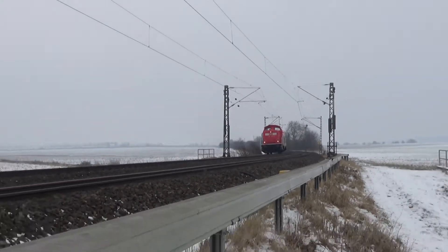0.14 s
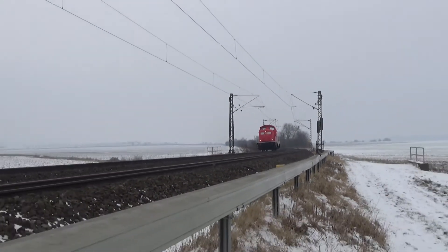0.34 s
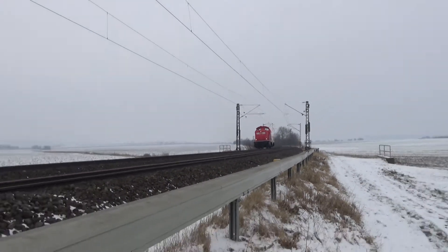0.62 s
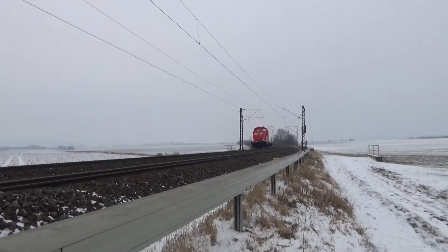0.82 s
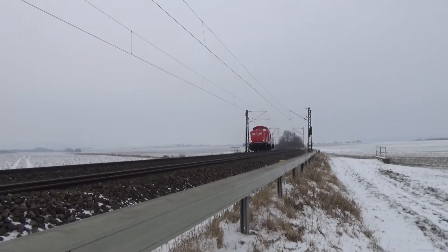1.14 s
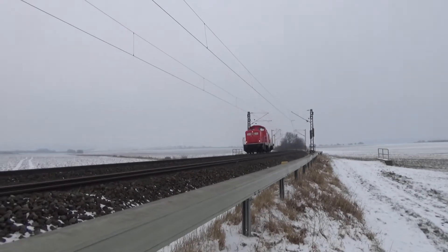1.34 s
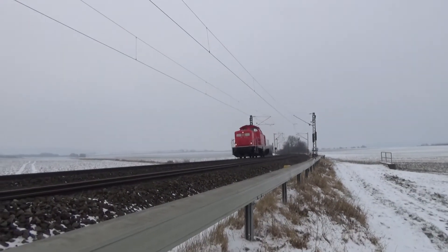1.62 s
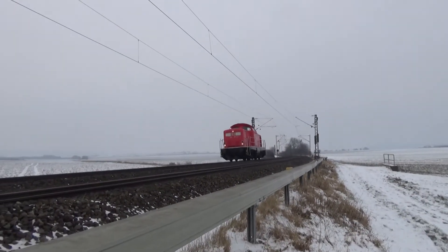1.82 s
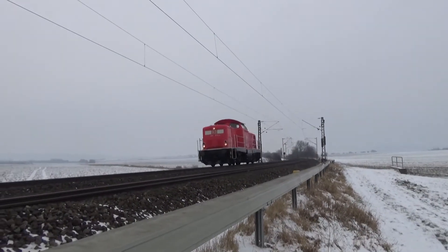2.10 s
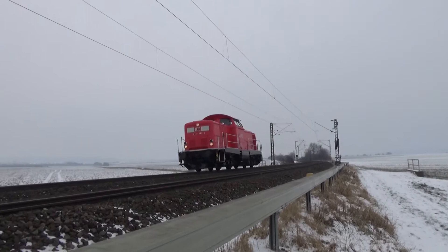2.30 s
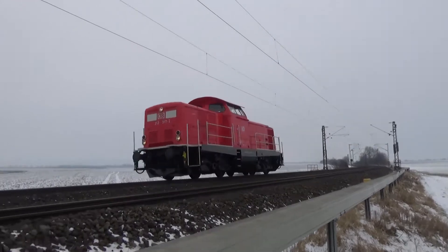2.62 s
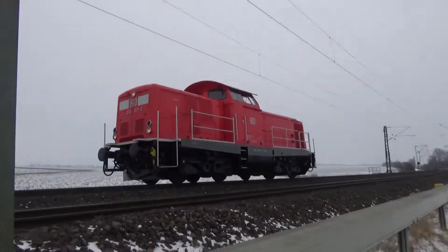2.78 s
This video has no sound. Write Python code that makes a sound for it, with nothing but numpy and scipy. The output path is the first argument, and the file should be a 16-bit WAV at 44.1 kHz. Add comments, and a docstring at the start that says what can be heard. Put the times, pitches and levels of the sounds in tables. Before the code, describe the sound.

A lone diesel locomotive approaches on ringing rails, its throbbing engine drone swelling into rolling roar

```python
"""Beside an open railway line a diesel locomotive approaches and draws level with the listener.
A faint steady noise floor underlies the rails, which ring ahead as noise-driven narrow resonances.
Rolling noise from the wheels swells as drone, roar and hiss; the drive adds an unsteady sine whine.
The engine is a sum of shaft orders over exhaust noise that puffs twice a cycle."""
import sys
import numpy as np
from scipy import signal
from scipy.fft import rfft, irfft, next_fast_len
from scipy.io import wavfile
from scipy.ndimage import uniform_filter1d, map_coordinates

SR = 44100
rng = np.random.default_rng(int(sys.argv[2]) if len(sys.argv) > 2 else 0)


def waveform_to_disk(signal):
    """Save audio, clipped to [-1, 1], as 16-bit WAV at the path in sys.argv[1]."""
    frames = np.transpose(np.atleast_2d(signal))
    scaled = np.clip(frames, -1, 1) * 32767
    samples = np.round(scaled).astype(np.int16)
    wavfile.write(sys.argv[1], SR, samples)


N = 130095


def amp(db):
    """Level law: amplitude gain is 10 to the power dB/20."""
    return 10 ** (np.asarray(db) / 20)


def unit(x):
    """Normalization of the effective value: rms 1."""
    return x / np.sqrt(np.mean(x ** 2) + 1e-20)


def along(points, hz, outside=None):
    """Logarithmic frequency scale: linear interpolation of (f/Hz, value) points over log f."""
    f, values = np.transpose(points)
    return np.interp(np.log(hz + 1), np.log(f + 1), values, outside, outside)


def curves(rows):
    """Slow modulation: each column after t/s interpolated to one value per sample."""
    t, *columns = np.transpose(rows)
    return [np.interp(np.arange(N) / SR, t, column) for column in columns]


def wobble(rate):
    """Random modulation: a spline through normal random knots, rate of them per second."""
    knots = rng.standard_normal(int(N * rate / SR) + 4)
    return map_coordinates(knots, [np.arange(N) * rate / SR])


def filtered(x, response):
    """Linear filtering: the spectrum multiplied by a complex response of frequency."""
    m = next_fast_len(N + SR // 4)
    spectrum = rfft(x, m) * response(np.fft.rfftfreq(m, 1 / SR))
    return irfft(spectrum, m)[..., :N]


def shape(points):
    """Spectral envelope: gain of an (f/Hz, level/dB) outline, -120 dB outside it."""
    return lambda hz: amp(along(points, hz, outside=-120))


def ringing(modes, levels_db):
    """Modal superposition: steep-sided resonances (f/Hz, width/Hz) added in power."""
    def gain(hz):
        power = 0
        for (f, width), db in zip(modes, levels_db):
            power = power + (amp(db) / (1 + ((hz - f) / width) ** 2) ** 1.22) ** 2
        return np.sqrt(power)
    return gain


def pan(db):
    """Interchannel level difference: left and right gains for a left-right difference."""
    return amp(np.array([db / 2, -db / 2]))


# Side signal relative to the mid signal, before each is filled with noise: f/Hz, level/dB
SIDE_SPREAD = [(100, -14), (1000, -82), (2500, -34), (6000, -33.5), (9000, -38), (13000, -39.5)]


def rush(gain, patchy_db):
    """Interchannel coherence: noise of rms 1 with patchy gain, mostly common to both channels."""
    z = signal.stft(rng.standard_normal((2, N)), nperseg=512)[2]
    field = rng.standard_normal(z.shape[1:])
    field = uniform_filter1d(field, size=8, axis=0)  # smooth over frequency
    field = uniform_filter1d(field, size=10, axis=1)  # smooth over time
    patchy = z * amp(patchy_db * unit(field))
    pair = signal.istft(patchy, nperseg=512)[1][:, :N]
    mid, side = filtered(pair, lambda hz: gain(hz) * np.array([1 + 0 * hz, amp(along(SIDE_SPREAD, hz))]))
    return unit(np.array([mid + side, mid - side]))


# Outline of the noise floor, strongest around 600-930 Hz: f/Hz, relative level/dB per Hz
FLOOR_SPECTRUM = [(450, -35), (600, -4), (780, 0), (930, -9), (1100, -30)]


def noise_floor():
    """Stationary random noise: a faint band of steady mean level."""
    return amp(-53.5) * rush(shape(FLOOR_SPECTRUM), patchy_db=0.3)


# Rails before fade and trim: t/s, singing level/dB, treble level/dB
RAIL_LEVELS = [(0, -43.5, -64), (.3, -40.5, -61.5), (.7, -37.5, -57.5), (1.1, -34, -53), (1.5, -31.5, -51),
               (1.9, -33, -48.5), (2.3, -29.5, -49.5), (2.95, -39, -46)]
# Share of song and treble as the wheels take over: t/s, level/dB
RAIL_SHARE = [(0, 4), (1.5, -2), (2.2, -3), (2.95, -11)]
# Thin rail whistle before its flicker: t/s, level/dB
WHISTLE_LEVELS = [(0, -66.5), (.6, -58.5), (1.2, -58.5), (1.8, -58.5), (2.3, -53), (2.95, -60)]
# Resonances of the singing rail: f/Hz, width/Hz; then one relative level/dB each
SONG_RESONANCES = [(1030, 50), (1070, 30), (1125, 30), (1190, 60), (1260, 18), (1340, 25), (1367, 18),
                   (1415, 30), (1540, 25), (1950, 40)]
SONG_RESONANCE_DB = [-13.5, -7, -7, -11, 1.5, -4, -4, -12, -29.5, -24]
# Resonances of the rail treble: f/Hz, width/Hz; then one relative level/dB each
TREBLE_RESONANCES = [(7080, 330), (7900, 600), (8750, 350), (9080, 130), (9780, 220), (10800, 250),
                     (11100, 300), (11900, 800), (13200, 1500)]
TREBLE_RESONANCE_DB = [-4, -9.5, -4, -1, -5, -0.5, 0.5, -2, -8.5]
# Resonances of the whistle: f/Hz, width/Hz; then one relative level/dB each
WHISTLE_RESONANCES = [(3470, 70), (4600, 500), (5150, 200), (5770, 80)]
WHISTLE_RESONANCE_DB = [-10.5, -18.5, -11.5, 0]
# Interchannel phase of treble and whistle: f/Hz, lead of the left/rad
LEFT_LEAD = [(5000, 0), (5800, -0.77), (6400, 0), (7200, -0.9), (8800, -0.59), (9500, 0)]


def rails():
    """Waveguide resonance: rails carry wheel noise ahead and ring in narrow bands; the song lies left."""
    song_db, treble_db = curves(RAIL_LEVELS)
    share_db, = curves(RAIL_SHARE)
    whistle_db, = curves(WHISTLE_LEVELS)

    song = rush(ringing(SONG_RESONANCES, SONG_RESONANCE_DB), patchy_db=0.24)
    song = pan(5.5)[:, None] * amp(song_db + share_db) * song

    treble = rush(ringing(TREBLE_RESONANCES, TREBLE_RESONANCE_DB), patchy_db=0.5)
    treble = amp(treble_db + 3.5 + share_db + 0.47 * wobble(20)) * treble  # 3.5 dB trim

    whistle = rush(ringing(WHISTLE_RESONANCES, WHISTLE_RESONANCE_DB), patchy_db=1.0)
    whistle = amp(whistle_db + 1.1 * wobble(24.5)) * whistle

    # half the lead forward on the left, half backward on the right
    high = filtered(treble + whistle, lambda hz: np.exp(.5j * np.outer([1, -1], along(LEFT_LEAD, hz))))
    return song + high


# Gear whine before jitter and trim: t/s, f/Hz, level/dB
WHINE_TRACK = [(1.6, 840.8, -49.5), (2.144, 848.8, -41.5), (2.186, 850.8, -51.5), (2.456, 836.6, -35),
               (2.476, 832.5, -62), (2.584, 833.9, -39.5), (2.95, 821.9, -38)]


def whine():
    """Frequency and amplitude modulation: an unsteady sine from the drive, heard when close."""
    hz, db = curves(WHINE_TRACK)
    onset = np.clip(np.arange(N) / SR / WHINE_TRACK[0][0], 0, 1) ** 3
    phase = 2 * np.pi * np.cumsum(hz + 4 * wobble(25)) / SR
    return onset * amp(db + 4.5 + 4.6 * wobble(15)) * np.sin(phase)  # 4.5 dB trim


# Rolling noise before trims and flutter: t/s, drone level/dB, roar level/dB, hiss level/dB
WHEEL_LEVELS = [(0, -49, -62.5, -78), (.3, -49, -56.5, -75.5), (.7, -42, -52.5, -70.5),
                (1.1, -38.5, -46, -66), (1.5, -32.5, -42, -59.5), (1.85, -28.5, -38.5, -55.5),
                (2.05, -24, -34.5, -51), (2.25, -24, -34.5, -47), (2.41, -23.5, -32, -44.5),
                (2.47, -21, -32.5, -46.5), (2.57, -22, -29.5, -45), (2.67, -20.5, -28.5, -44.5),
                (2.76, -26.5, -26, -45.5), (2.83, -25.5, -27, -48), (2.95, -27, -26, -44.5)]
# Upper roar relative to lower; sinks, brightens briefly near 2.5 s, sinks again: t/s, level/dB
ROAR_BRIGHTNESS = [(0, -1.5), (1.2, -2.5), (2, -4.5), (2.5, 2), (2.75, -2.5), (2.95, -3.5)]
# Drone resonances of wheel and rail: f/Hz, width/Hz; then one relative level/dB each
DRONE_RESONANCES = [(447, 28), (495, 28), (520, 20), (595, 30), (770, 35), (840, 28)]
DRONE_RESONANCE_DB = [2.5, 1, -3.5, -8, -14.5, -10.5]
# Outlines of the drone between its modes, the roar and the hiss: f/Hz, relative level/dB per Hz
DRONE_BETWEEN = [(300, -40), (350, -11), (500, -21.5), (650, -15.5), (950, -16.5), (1200, -11.5)]
ROAR_SPECTRUM = [(360, 2), (620, -2), (724, -7.5), (838, -7.5), (944, -7), (1660, -4), (2190, -9.5),
                 (2480, -10.5), (2820, -13.5), (3150, -14), (5500, -26), (7150, -60), (12100, -120)]
HISS_SPECTRUM = [(2060, -15), (3500, -1), (4800, -6), (5700, -3), (6500, -5.5), (9700, -5), (11800, -10.5),
                 (15000, -16.5), (16000, -22)]
DRONE_TRIM_DB, ROAR_TRIM_DB, HISS_TRIM_DB = 0.13, 4, 11
BRIGHT_HZ = 2330  # division between lower and upper roar


def wheels():
    """Rolling contact noise: a drone of wheel and rail modes, with roar and hiss that flutter together."""
    drone_db, roar_db, hiss_db = curves(WHEEL_LEVELS)
    bright_db, = curves(ROAR_BRIGHTNESS)
    flutter_db = 0.46 * wobble(20) + 0.7 * wobble(40)

    modes, between = ringing(DRONE_RESONANCES, DRONE_RESONANCE_DB), shape(DRONE_BETWEEN)
    drone = rush(lambda hz: np.hypot(modes(hz), between(hz)), patchy_db=-0.46)
    drone = pan(1.87)[:, None] * amp(drone_db + DRONE_TRIM_DB) * drone

    roar = rush(shape(ROAR_SPECTRUM), patchy_db=0.9)
    lower = filtered(roar, lambda hz: 1 / (1 + (hz / BRIGHT_HZ) ** 6))
    upper = roar - lower
    roar = amp(roar_db + ROAR_TRIM_DB + flutter_db) * (lower + amp(bright_db) * upper)

    hiss = rush(shape(HISS_SPECTRUM), patchy_db=1.0)
    hiss = amp(hiss_db + HISS_TRIM_DB + 0.92 * flutter_db) * hiss
    return drone + roar + hiss


# Engine before trim and pan: t/s, drone level/dB, exhaust rumble level/dB
ENGINE_LEVELS = [(0, -39, -45.5), (.36, -35, -46), (1, -31.5, -41), (1.6, -28, -35), (2.1, -24.5, -30),
                 (2.4, -24.5, -27.5), (2.65, -26.5, -28), (2.95, -25.5, -28)]
# Engine speed as heard: t/s, cycle rate f/Hz
CYCLE_RATE = [(0, 14.275), (.8, 14.265), (1.4, 14.245), (2, 14.22), (2.4, 14.17), (2.7, 14.07),
              (2.95, 13.95)]
# Shaft orders before focus and waver: multiple of the cycle rate, relative level/dB
ORDER_LEVELS = [(2, -19), (3, -28), (4, -9), (5, -22), (6, -13), (7, -16), (8, 0), (9, -10), (10, -1),
                (11, -9.5), (12, -1.5), (13, -8), (14, -15), (15, -22), (16, -11), (17, -15)]
# Narrowing of the drone as the engine draws level: t/s, level/dB per order away from FOCUS_ORDER
ORDER_FOCUS = [(0, 0), (2.3, 0), (2.6, -.7), (2.95, -1.5)]
# Outline of the exhaust noise: f/Hz, relative level/dB per Hz
EXHAUST_SPECTRUM = [(12, -51), (20, -23), (54, -10), (108, -6), (173, -0.5), (210, -3.5), (253, -3.5),
                    (320, -9.5), (380, -20.5), (490, -19), (840, -120)]
# Left-right difference of the engine: f/Hz, level/dB
ENGINE_PAN = [(40, -2), (90, 0.2), (160, 0.3), (260, 0.7), (380, 2.2)]
FOCUS_ORDER, ORDER_WAVER_DB = 7.5, 1.2
MAIN_ORDERS = (8, 10, 12)  # the three strongest, with their own quadratic phase rule
PHASE_START, PHASE_SLOPE, PHASE_CURVATURE = .25, .172, .096  # turns: constant, per order, per order squared
EVEN_LAG, ODD_LAG = -.05, .16  # turns, for the other orders
PUFF_DEPTH, PUFF_LEAD, RUMBLE_TRIM_DB = 0.19, 2.32, 0.5  # share, rad, dB


def order_lead(order):
    """Firing pattern: phase rule of the strong orders, fixed lags of the others, in turns."""
    if order in MAIN_ORDERS:
        return PHASE_START + PHASE_SLOPE * order + PHASE_CURVATURE * order * order
    return -(ODD_LAG if order % 2 else EVEN_LAG)


def engine():
    """Fourier synthesis: shaft orders locked to one cycle, with exhaust noise modulated twice a cycle."""
    rate, = curves(CYCLE_RATE)
    drone_db, rumble_db = curves(ENGINE_LEVELS)
    focus_db, = curves(ORDER_FOCUS)
    turn = 2 * np.pi * np.cumsum(rate) / SR

    drone = 0
    for order, db in ORDER_LEVELS:
        level_db = db + focus_db * abs(order - FOCUS_ORDER) + ORDER_WAVER_DB * wobble(4.02)
        drone = drone + amp(level_db) * np.cos(order * turn + 2 * np.pi * order_lead(order))

    puff = 1 + PUFF_DEPTH * np.cos(2 * turn + PUFF_LEAD)
    exhaust = puff * rush(shape(EXHAUST_SPECTRUM), patchy_db=0.0)
    both = amp(drone_db) * unit(drone) + amp(rumble_db + RUMBLE_TRIM_DB) * exhaust
    return filtered(both, lambda hz: pan(along(ENGINE_PAN, hz)))


def scene():
    """Linear superposition: all sources add in the open air."""
    return noise_floor() + rails() + whine() + wheels() + engine()


def record(dry):
    """Band limitation: the sound holds nothing from 15750 Hz upward."""
    return filtered(dry, lambda hz: hz < 15750)


dry = scene()
out = record(dry)
waveform_to_disk(out)
```